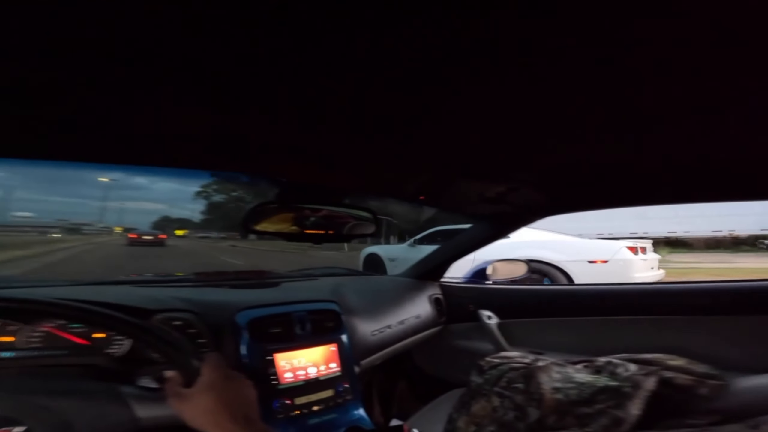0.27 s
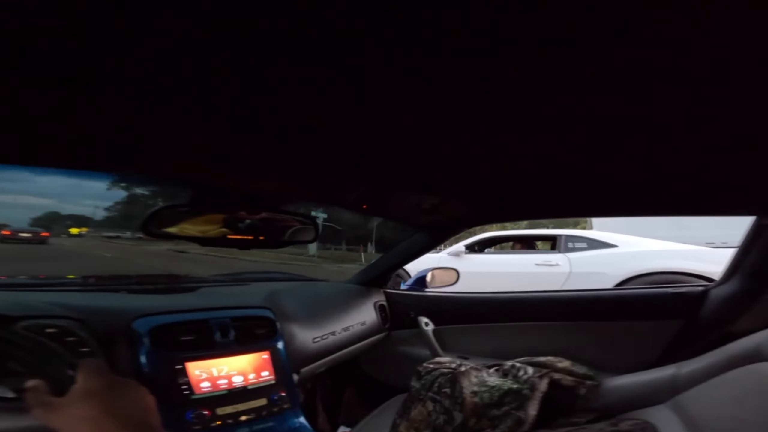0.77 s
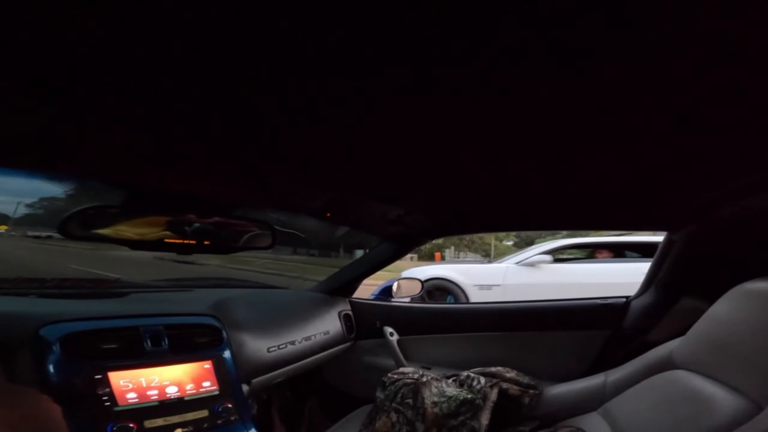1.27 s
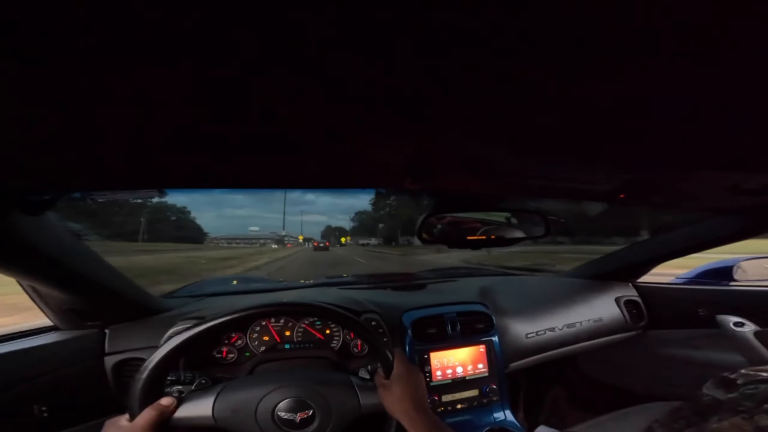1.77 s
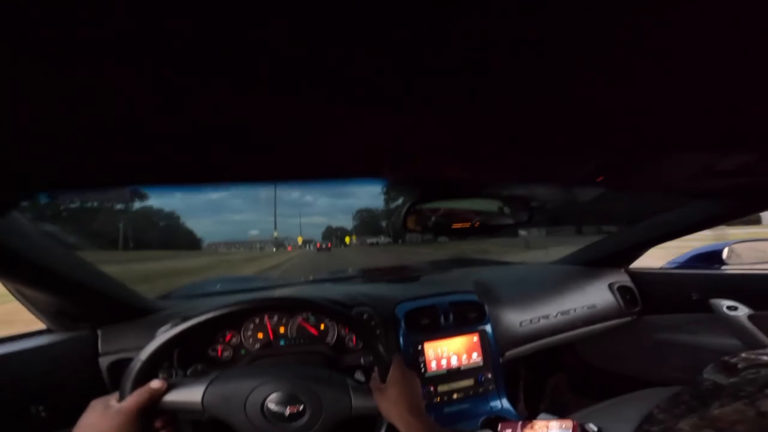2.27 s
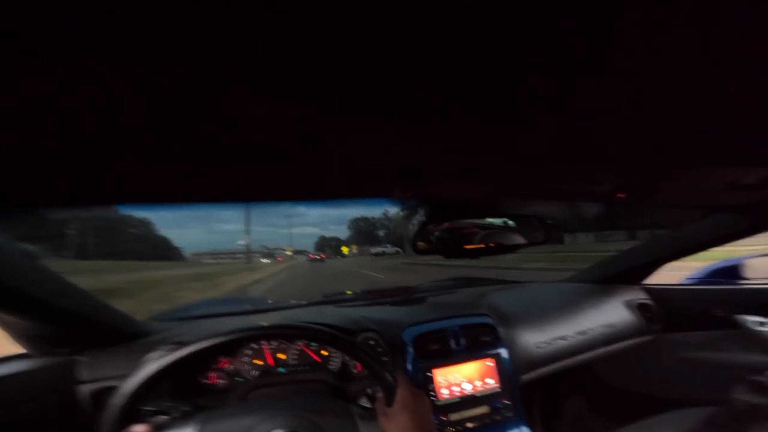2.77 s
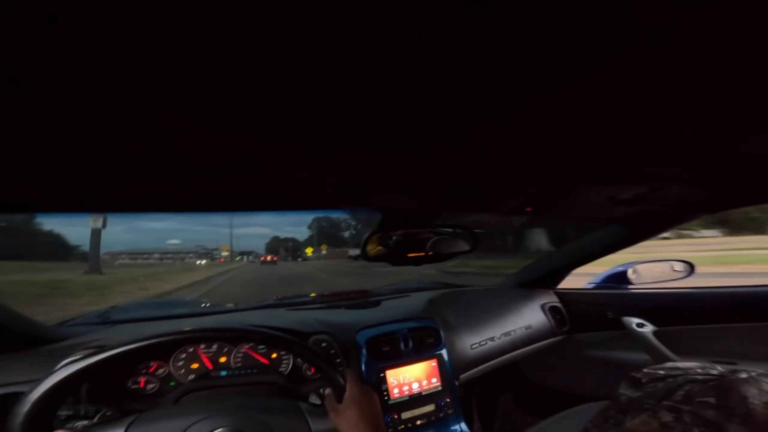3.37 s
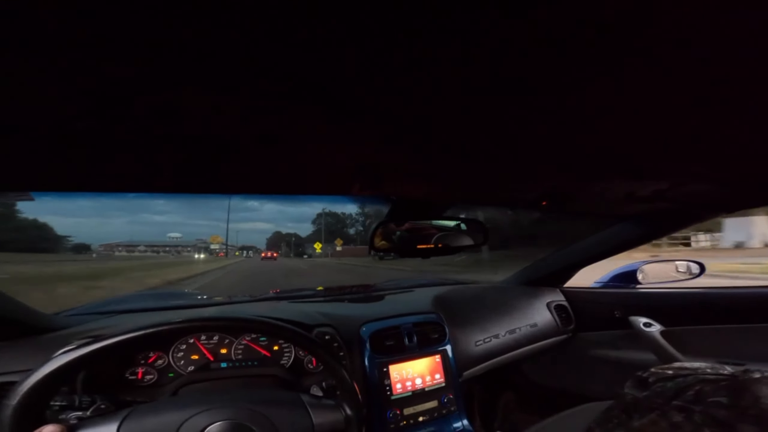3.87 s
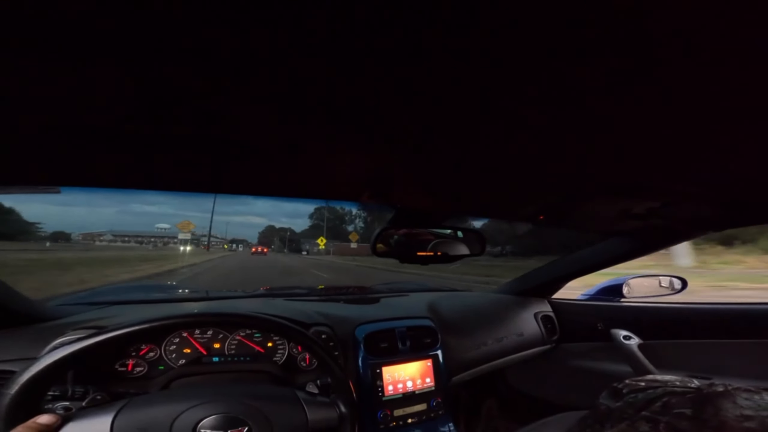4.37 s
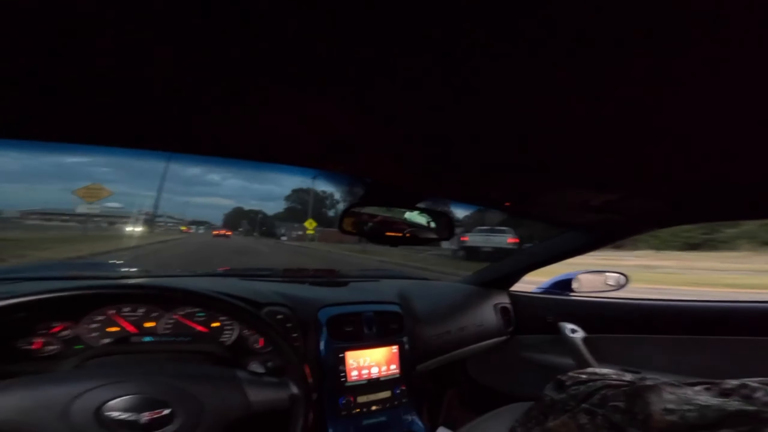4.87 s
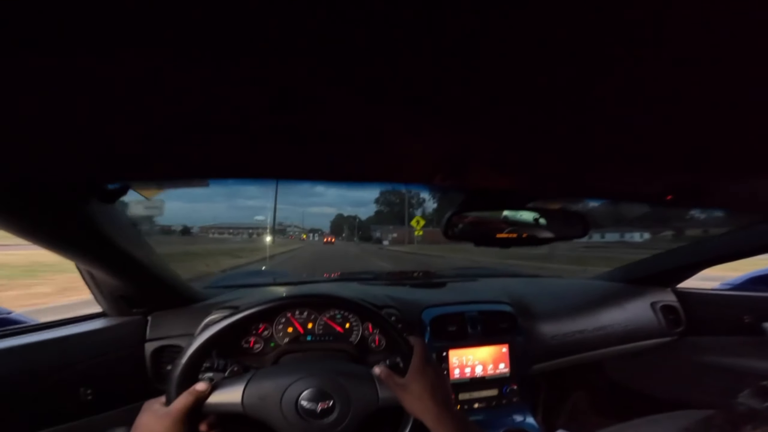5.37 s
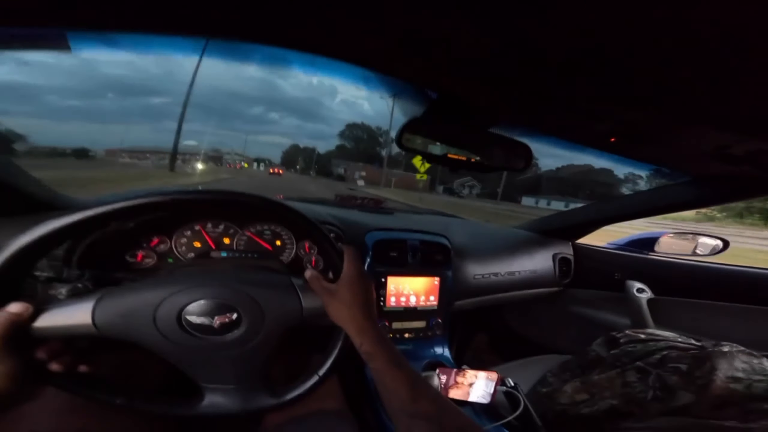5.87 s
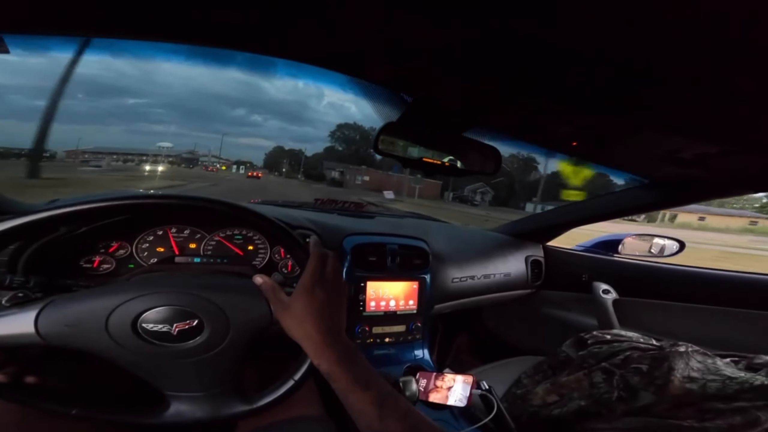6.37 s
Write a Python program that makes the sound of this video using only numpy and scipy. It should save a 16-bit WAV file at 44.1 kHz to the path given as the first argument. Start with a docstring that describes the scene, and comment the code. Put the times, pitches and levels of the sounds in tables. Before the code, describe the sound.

From the driver's seat, a V8 sports car rumbles and sputters off the throttle, its exhaust popping and the cabin booming over low road and wind noise. A soft hiss swells as a car is passed, and the engine barks twice with raspy revs. It sinks back into a crackling burble with falling pitch, then smooths out and accelerates, growing louder and higher.

```python
"""In the driver's seat of a V8 sports car with an open exhaust, out on the road.
The car coasts with a booming burble while unburnt fuel pops in the pipes. It takes two stabs of
throttle, coasts again, then settles into a clean drone and pulls away harder and harder.
Eight cylinders puff out gas in turn, which makes the pipes ring and the cabin boom.
Tyres and wind rush underneath, and early on another car hisses as it is passed."""
import sys
import numpy as np
from scipy import signal
from scipy.fft import rfft, irfft, next_fast_len
from scipy.io import wavfile
from scipy.ndimage import uniform_filter1d, minimum_filter1d, map_coordinates

SR = 44100
rng = np.random.default_rng(int(sys.argv[2]) if len(sys.argv) > 2 else 0)


def persist_wave(psi):
    """Save psi, clipped to +-1, as 16-bit WAV."""
    counts = np.round(np.clip(psi, -1, 1) * 32767).astype(np.int16)
    wavfile.write(sys.argv[1], SR, np.atleast_2d(counts).T)


N = 291501

# tone colour of the pipes' bark and of the gas's rasp at full throttle: f/Hz, level/dB
FULL_BARK_COLOUR = [(300, -38), (420, -0.5), (520, -2.5), (610, -1.5), (720, -9), (880, -3.5), (1100, -2),
                    (1300, -5), (1650, 0.5), (2000, -8.5), (2700, -27.5), (6000, -100)]
FULL_RASP_COLOUR = [(1400, -0.5), (2100, 4), (2500, -4), (3500, 0), (4500, -8.5), (5200, -7), (7300, -14),
                    (8500, -18.5), (10000, -19), (11000, -29.5), (13500, -30.5), (15000, -59)]
KICK_S, LULL_S = .07, 1  # letting go of the pedal gives a short kick and a longer lull


def amp(db):
    """Turn decibels into a gain."""
    return 10 ** (np.asarray(db) / 20)


def unit(x):
    """Scale a sound to an average (rms) level of 1."""
    return x / np.sqrt(np.mean(x ** 2) + 1e-20)


def along(points, hz):
    """Read between (frequency, value) points, with octaves evenly spaced."""
    freqs, values = np.transpose(points)
    return np.interp(np.log(hz + 1), np.log(freqs + 1), values)


def curve(points):
    """Join (time, value) points with straight lines, one value a sample."""
    return np.interp(np.arange(N) / SR, *np.transpose(points))


def wobble(rate):
    """A smooth random curve that takes `rate` new values a second."""
    return map_coordinates(rng.standard_normal(int(N * rate / SR) + 4), [np.arange(N) * rate / SR])


def filtered(x, response):
    """Turn each frequency up or down by the gain response(hz)."""
    size = next_fast_len(N + SR // 2)
    return irfft(rfft(x, size) * response(np.fft.rfftfreq(size, 1 / SR)), size)[..., :N]


def in_cabin(pair, colour):
    """Give two unrelated sounds a tone colour and mix them to stereo: bass alike, treble apart."""
    likeness = [(110, 1), (260, .93), (500, .8), (1000, .55), (2000, .3), (4000, .62), (8000, .75)]  # how alike the two ears' sounds are: f/Hz, likeness/0-1
    angle = lambda hz: np.arccos(np.clip(along(likeness, hz), -1, 1)) / 2
    mid, side = filtered(pair, lambda hz: amp(along(colour, hz)) * [np.cos(angle(hz)), np.sin(angle(hz))])
    return np.array([mid + side, mid - side]) / np.std(mid)


def steadied(x, seconds, share):
    """Even out a share of the loudness swings that are slower than the given time."""
    power = np.mean(np.atleast_2d(x) ** 2, axis=0)
    size = max(int(seconds * SR), 8)
    power = np.abs(uniform_filter1d(uniform_filter1d(power, size), size)) + 1e-9
    return unit(x / power ** (share / 2))


def blend(a, b, share):
    """Fade from a to b without a dip in power."""
    share = np.clip(share, 0, 1)
    return np.sqrt(1 - share) * a + np.sqrt(share) * b


def resonance(hz, centre_hz, half_width_hz, db=0):
    """A pipe or cabin answers most to tones near its own note: the gain at each frequency."""
    return amp(db) / (1 + ((hz - centre_hz) / half_width_hz) ** 2)


def ringing_noise(hz, half_width_hz, size):
    """Swirling gas heard through one resonance, at an even level."""
    gains = resonance(np.fft.rfftfreq(size, 1 / SR), hz, half_width_hz)
    noise = irfft(rfft(rng.standard_normal(size)) * gains, size)
    return steadied(noise, seconds=.0032, share=1)


def burst(t, rise_s, hold_s, t60):
    """Loudness of a burst of gas: a quick rise, a hold, then a fall of 60 dB in t60 seconds."""
    return (1 - np.exp(-t / rise_s)) * amp(-60 * np.maximum(t - hold_s, 0) / t60)


def pedal(press_s=.03, release_s=.08):
    """The driver's foot: how far the throttle is open (0-1), and the extra treble of a stab in dB."""
    pull_away = [(4.51, 0), (4.56, 0.22), (4.84, 0.29), (4.885, 0.26), (4.97, 0.37), (5.42, 0.33),
                 (5.6, 0.64), (5.92, 0.51), (6.2, .66), (6.33, 0.8), (6.61, 0.83)]  # the long last press: t/s, throttle/0-1
    stabs = [(0.875, 0.935, 0.07, -2), (1.565, 1.776, 0.96, 9.5), (1.86, 1.997, 0.08, 1.5),
             (1.974, 2.525, 1, 1), (4.159, 4.257, 0.05, 0)]  # short presses: down/s, up/s, throttle/0-1, extra treble rasp/dB
    t = np.arange(N) / SR
    throttle, tear_db = curve(pull_away), np.zeros(N)
    for down, up, opening, db in stabs:
        press = np.clip(np.minimum((t - down) / press_s, 1 - (t - up) / release_s), 0, 1)
        throttle = np.maximum(throttle, opening * press)
        tear_db += db * press
    return np.clip(throttle, 0, 1), tear_db


def lift_off(throttle, seconds):
    """How far the throttle has just closed (0-1), forgotten over the given time."""
    keep = np.exp(-1 / (seconds * SR))
    return np.maximum(signal.lfilter([1 - keep], [1, -keep], throttle) - throttle, 0)


def firings(cycle, scatter_db):
    """One click of random size each time a cylinder lets out its gas, eight to an engine cycle."""
    at = np.flatnonzero(np.diff(np.floor(8 * cycle)))
    clicks = np.zeros(N)
    clicks[at] = amp(scatter_db * np.clip(rng.standard_normal(len(at)), -2, 2))
    return clicks


def pulses(cycle, scatter_db, life_s):
    """The gas flow jumps at each firing and dies away quickly."""
    return signal.lfilter([1], [1, -np.exp(-1 / (life_s * SR))], firings(cycle, scatter_db))


def ripple(cycle, drift_cycles=.012, count=200):
    """A fine pressure pattern that comes back every engine cycle, slowly changing shape."""
    overtones = amp(3 * rng.standard_normal((4, count))) * np.exp(2j * np.pi * rng.random((4, count)))
    shapes = irfft(overtones, 2 ** 12)
    grid = np.linspace(0, 1, shapes.shape[1], endpoint=False)
    ripples = np.array([np.interp(cycle + drift_cycles * wobble(5), grid, s, period=1) for s in shapes])
    angle = .8 * wobble(3)
    return unit(np.cos(angle) * ripples[:2] + np.sin(angle) * ripples[2:])


def exhaust_gas(cycle, noisy_share, scatter_db=2.5, life_s=.003):
    """Gas in the pipes: the repeating ripple mixed with a puff of noise at each firing."""
    buzz = ripple(cycle)
    puffs = unit(pulses(cycle, scatter_db, life_s) * rng.standard_normal((2, N)))
    return blend(buzz, puffs, noisy_share)


def drone(cycle_hz, cycle, throttle, growl_db, pipe_hz=245, even_db=2.5, odd_db=-9, count=25):
    """Clean exhaust tones: the firing note, and the growl of cylinders that are not quite equal."""
    tones = [(.24, [-37.5, -28.5, -36.5, -30, -51.5, -35, -29.5, -17, -43.5, -56.5, -47, -42, -58.5, -48, -41]),
             (.34, [-40, -27.5, -34.5, -31, -40, -36, -22.5, -18, -31.5, -33, -48, -44.5, -40, -48, -40, -46, -39.5, -52.5, -51, -39]),
             (.6, [-31.5, -30.5, -25, -26, -26.5, -35.5, -18, -21.5, -24.5, -42, -50.5, -45.5, -44.5, -35, -40.5, -33.5, -41.5, -46, -47]),
             (.83, [-24, -20, -30.5, -30.5, -27, -23, -27.5, -24.5, -26.5, -40, -42, -53.5, -50, -51, -48, -28, -42.5, -42.5, -43, -37.5, -40.5]),
             (1, [-38.5, -16.5, -22.5, -25.5, -22.5, -19, -34.5, -25.5, -30, -37, -39, -49, -44, -36.5, -50, -49, -54, -49.5, -49, -37, -40, -54, -41.5, -39, -38])]  # tones at 1, 2, 3... times the cycle rate: throttle/0-1, [level/dB of each]
    # resonances that the tones sweep through: f/Hz, half width/Hz, level/dB
    firing_mode = (273.3, 14.5, -21.5)
    howl_modes = [(334, 22, -20), (629, 13, -32)]
    openings = [0] + [opening for opening, _ in tones]
    gains = np.array([np.zeros(count)] + [np.pad(amp(db), (0, count - len(db))) for _, db in tones])
    shut = np.interp(throttle, [0, .21], [1, 0])  # fuel burns unevenly with the throttle shut
    unsteady = .08 + .92 * shut * (1 - lift_off(throttle, LULL_S)) + .28 * throttle ** 3
    coasting = shut * np.clip(1 - 2 * lift_off(throttle, KICK_S), 0, 1)
    out = np.zeros(N)
    for k in range(1, count + 1):
        hz = k * cycle_hz
        gain = np.interp(throttle, openings, gains[:, k - 1])
        if k == 8:  # the firing note
            gain += (1 - throttle ** 2) * resonance(hz, *firing_mode)
        else:  # when coasting, only tones near the pipe's own note carry
            pipe = resonance(hz, pipe_hz, half_width_hz=16, db=odd_db if k % 2 else even_db)
            gain += amp(growl_db) * coasting * pipe
        howl = throttle ** 3 * sum(resonance(hz, *mode) for mode in howl_modes)
        phase = 2 * np.pi * (k * cycle + rng.random()) + 1.11 * unsteady * wobble(28)
        flutter = amp(3.2 * unsteady * wobble(34))
        out += np.sqrt(2) * np.hypot(gain, howl) * flutter * np.sin(phase)
    return out


def burble(cycle, throttle, growl_db, boom_db, gap_db=-13):
    """Uneven firings knock in the pipes and set the air of the cabin booming."""
    # tone colour of the cabin's air and of the pipes' bass: f/Hz, level/dB
    cabin_colour = [(15, -41.5), (30, -15.5), (40, -2), (47, 4.5), (55, -1.5), (64, -13.5), (80, -33),
                    (300, -120)]
    pipe_colour = [(50, -49.5), (70, -2), (88, -3), (125, 3), (180, -13.5), (250, 1), (310, -0.5),
                   (380, -14), (1200, -120)]
    gaps = [(0.139, 0.025), (0.343, .018), (0.428, 0.013), (0.506, .018), (0.751, .02), (0.985, 0.021),
            (1.409, 0.036), (3.121, 0.017), (3.516, .018), (4.196, .025)]  # the boom dips between its surges: t/s, half length/s
    t = np.arange(N) / SR
    dips_db = gap_db * sum(np.exp(-((t - at) / half_s) ** 2) for at, half_s in gaps)
    boom_gain = amp(boom_db + dips_db + 1.5 * wobble(16))
    knocks = lambda: firings(cycle, scatter_db=3) * rng.standard_normal((2, N))
    boom = steadied(in_cabin(knocks(), cabin_colour), seconds=.059, share=.83)
    growl = steadied(in_cabin(knocks(), pipe_colour), seconds=.055, share=.73)
    uneven_db = np.interp(throttle, [0, .3, .62, 1], [1, -9.5, -7, -11])
    return boom_gain * boom + amp(growl_db + uneven_db) * growl


def bark(cycle, throttle, bark_db):
    """The pipes' middle notes: a ragged sputter when coasting, a buzz that brightens with throttle."""
    # tone colour when coasting and at part throttle: f/Hz, level/dB
    coast_colour = [(210, -39), (350, -14.5), (404, 3.5), (477, 5), (624, -5.5), (824, -1), (896, -6),
                    (1100, -8), (2600, -28.5), (3380, -58.5), (5720, -120)]
    part_colour = [(380, -18), (490, 0), (680, -8), (830, 0.5), (1050, 1), (1280, -11.5), (1500, -4),
                   (1900, -23), (2700, -31), (6000, -110)]
    ragged = in_cabin(exhaust_gas(cycle, noisy_share=.6, scatter_db=5), coast_colour)
    sputter = amp(1.9 * wobble(20)) * steadied(ragged, seconds=.14, share=1)
    gas = exhaust_gas(cycle, noisy_share=.2)
    buzz = blend(amp(-1.5) * in_cabin(gas, part_colour), in_cabin(gas, FULL_BARK_COLOUR), throttle ** 4)
    return amp(bark_db) * blend(sputter, buzz, throttle / .2)


def rasp(cycle, throttle, rasp_db, tear_db, treble_hz=2500):
    """Gas tears out of the pipes and air intake; each stab has its own amount of extra treble."""
    coast_colour = [(1400, -21), (2100, -6.5), (2600, -2.5), (3400, 1), (4300, -3.5), (5500, -6.5),
                    (7500, -15.5), (8500, -21), (10000, -24.5), (11000, -37.5), (15000, -62.5)]  # tone colour when coasting: f/Hz, level/dB
    soft = amp(3) * in_cabin(exhaust_gas(cycle, noisy_share=.93, life_s=.006), coast_colour)
    hard = amp(7.5) * in_cabin(exhaust_gas(cycle, noisy_share=.7), FULL_RASP_COLOUR)
    gas = amp(rasp_db) * blend(soft, hard, throttle ** 4.5)
    treble = filtered(gas, lambda hz: hz ** 10 / (hz ** 10 + treble_hz ** 10))
    return gas + (amp(tear_db) - 1) * treble


def road():
    """Tyres and wind make a low rush that gently swells and sinks."""
    colour = [(25, -2), (130, -8.5), (260, -24.5), (420, -21), (1400, -25.5), (2600, -41.5), (5500, -57),
              (12000, -74.5)]  # tone colour of the rush: f/Hz, level/dB
    return amp(-25 + 2.9 * wobble(.96)) * in_cabin(rng.standard_normal((2, N)), colour)


def pipe_bursts(events, half_width_hz, rise_s, hold_s, t60):
    """Bursts of gas, each ringing one note of the pipes; events are t/s, level/dB, f/Hz."""
    t = np.arange(SR // 4) / SR
    shape = burst(t, rise_s, hold_s, t60)
    out = np.zeros(N + SR)
    for at, db, hz in events:
        out[round(at * SR):][:len(t)] += amp(db) * shape * ringing_noise(hz, half_width_hz, len(t))
    return out[:N]


def pops(cycle):
    """Unburnt fuel goes off deep in the pipes; each muffled pop is chopped by the next few firings."""
    events = [(0.004, -22.5, 1100), (0.051, -26.5, 980), (0.16, -24, 1130), (0.272, -22.5, 816),
              (0.352, -27.5, 597), (0.392, -22.5, 775), (0.464, -28.5, 815), (0.54, -31, 697),
              (0.578, -24, 618), (0.63, -27, 700), (0.688, -25, 735), (0.787, -22, 618), (0.895, -24, 724),
              (0.934, -24.5, 980), (1.04, -23, 670), (1.075, -26, 1040), (1.123, -25.5, 536),
              (1.165, -25, 660), (1.205, -24, 596), (1.288, -26, 823), (1.325, -23, 800), (1.358, -29, 916),
              (1.462, -23, 1033), (1.5, -25.5, 582), (2.999, -28, 790), (3.07, -31, 846), (3.198, -28, 690),
              (3.255, -28.5, 720), (3.308, -30.5, 650), (3.35, -28.5, 800), (3.415, -24.5, 702),
              (3.475, -23.5, 748), (3.596, -23, 710), (3.704, -24.5, 707), (3.785, -25.5, 696),
              (3.862, -26, 1120), (3.895, -29.5, 795), (3.94, -33.5, 990), (4, -24.5, 808.2),
              (4.196, -27.5, 662), (4.233, -26.5, 1110), (4.285, -31, 610), (4.32, -24, 554),
              (4.39, -31.5, 1110), (4.455, -32.5, 1015)]  # pops and the notes they ring: t/s, relative level/dB, f/Hz
    rings = pipe_bursts(events, half_width_hz=300, rise_s=.0015, hold_s=.02, t60=.12)
    chop = blend(.85, unit(pulses(cycle, scatter_db=3, life_s=.003)), share=.37)
    # f/Hz, level/dB
    muffling = [(200, -19.5), (420, 1.5), (800, -3), (1600, -3.5), (2500, -2), (4000, -3), (8000, -19.5)]
    return filtered(rings * chop, lambda hz: amp(along(muffling, hz)))


def cracks():
    """Fuel goes off at the open end of the pipe: a bright tear on top of a bark."""
    events = [(0.049, -37.5, 11000), (0.403, -37.5, 6003), (3.487, -40.5, 11000)]  # tailpipe bangs: t/s, relative level/dB, dull above f/Hz
    body = amp(1) * in_cabin(rng.standard_normal((2, N)), FULL_BARK_COLOUR)
    tear = in_cabin(rng.standard_normal((2, N)), FULL_RASP_COLOUR)
    t = np.arange(N) / SR
    out = np.zeros((2, N))
    for at, db, dull_hz in events:
        level = amp(db + 14.5) * burst(np.maximum(t - at, 0), rise_s=.002, hold_s=0, t60=.099)
        out += filtered(level * (body + tear), lambda hz: 1 / np.hypot(1, (hz / dull_hz) ** 3))
    return out


def chuffs(pipe_hz=122):
    """Bigger gulps of gas go off and thud at a low note of the pipes."""
    gulps = [(0.119, -21.5), (0.195, -19.5), (0.35, -16.5), (0.555, -23.5), (0.898, -20.5), (1.142, -21),
             (1.269, -19.5), (1.353, -17.5), (2.993, -17.5), (3.044, -16.5), (3.235, -19.5), (3.459, -19),
             (4.196, -18), (4.27, -20), (4.43, -23.5), (4.87, -19.5)]  # deep thuds: t/s, level/dB
    events = [(at, db, pipe_hz) for at, db in gulps]
    return pipe_bursts(events, half_width_hz=35, rise_s=.0039, hold_s=.023, t60=.14)


def flares():
    """Now and then the gas flow stirs up one resonance, which briefly swells and fades."""
    swells = [(1.057, .035, 3150, 510, -35), (1.468, 0.014, 3200, 500, -39),
              (1.623, 0.046, 3260, 620, -29.5), (2.399, 0.091, 5270, 500, -38.5),
              (4.306, 0.019, 1226, 120, -27.5), (5.63, 0.054, 930, 80, -30.5), (5.97, .1, 173, 14, -23.5)]  # loudest at t/s, half length/s, f/Hz, half width/Hz, level/dB
    t = np.arange(-SR // 5, SR // 5) / SR
    out = np.zeros(N + SR)
    for at, half_s, hz, half_width_hz, db in swells:
        level = amp(db) * np.exp(-(t / half_s) ** 2)
        out[round((at + t[0]) * SR):][:len(t)] += level * ringing_noise(hz, half_width_hz, len(t))
    return out[:N]


def passing_car():
    """The hiss of a car being passed swells and fades, with two wavering bands ringing in the cabin."""
    # closest at t/s, time to half the level before/s and after/s, level/dB
    passing = (1.43, 0.55, .25, -39.5)
    ringing_bands = [(2830, 130), (3380, 180)]  # high bands that ring in the cabin: f/Hz, half width/Hz
    closest, before, after, db = passing
    colour = [(1200, -75), (2400, -24), (2800, 1), (3500, 3), (4200, -6.5), (6500, -10),
              (10000, -24), (15000, -83)]  # f/Hz, level/dB
    hiss = in_cabin(rng.standard_normal((2, N)), colour)
    ringing = np.zeros(N)
    for band in ringing_bands:
        waver = amp(3 * wobble(16))
        ringing += waver * unit(filtered(rng.standard_normal(N), lambda hz: resonance(hz, *band)))
    t = np.arange(N) / SR - closest
    nearness = 1 / (1 + (t / np.where(t < 0, before, after)) ** 2)
    return amp(db) * nearness * blend(hiss, unit(ringing), share=.51)


def thumps(cabin_hz=43.8, rise_s=.032):
    """The air of the cabin swings a few times when the throttle snaps shut."""
    events = [(1.778, -10), (2.546, -11)]  # one thump after each full stab: t/s, level/dB
    t = np.arange(SR // 3) / SR
    swing = (t / rise_s * np.exp(1 - t / rise_s)) ** 2 * np.sin(2 * np.pi * cabin_hz * t)
    out = np.zeros(N + SR)
    for at, db in events:
        out[round(at * SR):][:len(t)] += amp(db) * swing
    return out[:N]


def window_echoes(x, echo_db=-10, spread_s=.012, above_hz=1100, count=10):
    """Windows and dashboard throw back quick echoes that lift some high notes and weaken others."""
    draws = rng.random((count, 2))
    delays, signs = spread_s * (.15 + draws[:, 0]), np.sign(draws[:, 1] - .5)

    def response(hz):
        strength = amp(echo_db) * hz ** 2 / (hz ** 2 + above_hz ** 2)
        echoes = signs @ np.exp(-2j * np.pi * np.outer(delays, hz)) / np.sqrt(count)
        return (1 + strength * echoes) / np.hypot(1, strength)
    return filtered(x, response)


def scene():
    """Engine speed and throttle shape the exhaust; pops and road noise join in, louder on the left."""
    engine_speed = [(0, 38.26), (1.1, 34.04), (1.585, 32.97), (1.68, 38.2), (1.8, 38.82), (1.97, 33.06),
                    (2.1, 40.58), (2.3, 42.74), (2.49, 43.25), (2.6, 41.64), (2.69, 40.45), (2.92, 40.55),
                    (3.6, 37.11), (4.86, 31.96), (5.11, 33.8), (5.34, 32.78), (5.55, 34.45), (5.82, 35.25),
                    (6.23, 37.8), (6.42, 39.6), (6.61, 40.32)]  # engine cycles, eight firings each: t/s, f/Hz
    layer_levels = [(0, -14, -21.5, -28, -51), (.25, -31, -27.5, -43, -54.5), (.36, -30, -22, -34, -50),
                    (0.6, -34.5, -18.5, -31, -44), (.84, -30, -13.5, -27, -40.5),
                    (1, -32.5, -17, -27, -37.5)]  # engine loudness: throttle/0-1, boom/dB, growl/dB, bark/dB, rasp/dB
    left_lead = [(60, 0.5), (110, 0), (220, 1.95), (410, 5.5), (770, 0), (1460, 6.5), (2760, 3.5),
                 (5230, 0.5), (9910, 2.5)]  # how much louder the left side is: f/Hz, level/dB
    cycle_hz = curve(engine_speed)
    throttle, tear_db = pedal()
    shake = .0041 * throttle ** 4 * wobble(45)  # flat out, the engine turns unevenly
    cycle = np.cumsum(cycle_hz) / SR + shake
    openings, *levels = np.transpose(layer_levels)
    boom_db, growl_db, bark_db, rasp_db = [np.interp(throttle, openings, db) for db in levels]
    # letting go kicks the boom and rasp; then the pipes ease until unburnt fuel has gathered again
    kick, lull = lift_off(throttle, KICK_S), lift_off(throttle, LULL_S)
    boom_db += kick - 7 * lull
    bark_db -= 3.5 * lull
    rasp_db += 15.5 * kick - 6.5 * lull
    rasp_db += .5 * throttle * (cycle_hz - 40)  # with the pedal down, a faster engine rasps more
    low = drone(cycle_hz, cycle, throttle, growl_db) + chuffs() + thumps()
    low = low + burble(cycle, throttle, growl_db, boom_db)
    high = bark(cycle, throttle, bark_db) + pops(cycle) + cracks() + flares()
    high += rasp(cycle, throttle, rasp_db, tear_db)
    mix = low + window_echoes(high + road() + passing_car())
    return filtered(mix, lambda hz: amp(np.outer([.5, -.5], along(left_lead, hz))))


def record(dry, ceiling=.66, hold_s=.0064, top_hz=15000):
    """A limiter turns the loudest peaks down, and the very highest treble is cut off."""
    size = int(hold_s * SR)
    needed = np.minimum(1, ceiling / (np.abs(dry).max(axis=0) + 1e-9))
    gain = uniform_filter1d(minimum_filter1d(needed, 2 * size), size)
    return filtered(dry * gain, lambda hz: hz < top_hz)


dry = scene()
out = record(dry)
persist_wave(out)
```